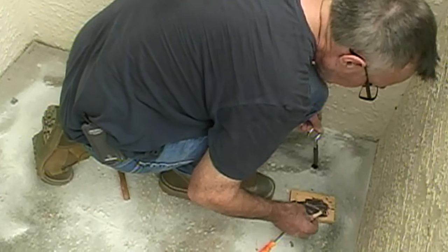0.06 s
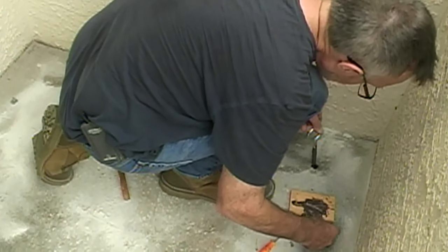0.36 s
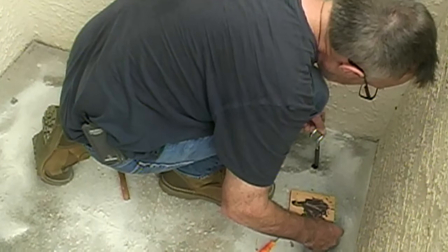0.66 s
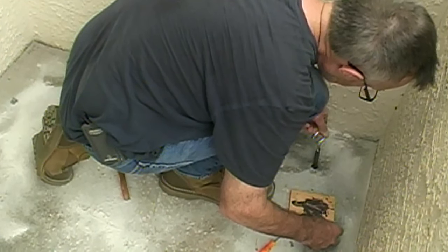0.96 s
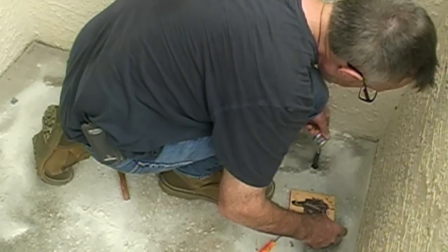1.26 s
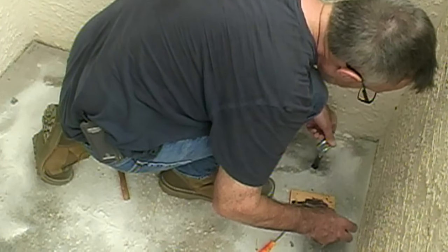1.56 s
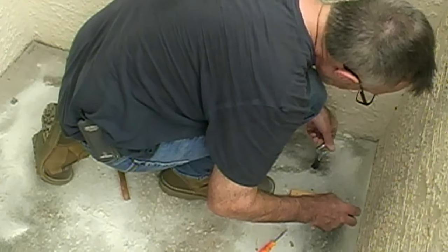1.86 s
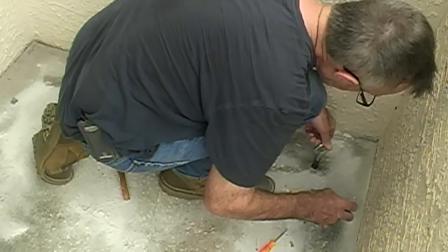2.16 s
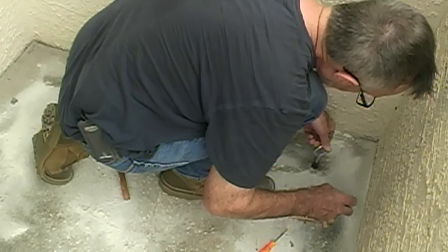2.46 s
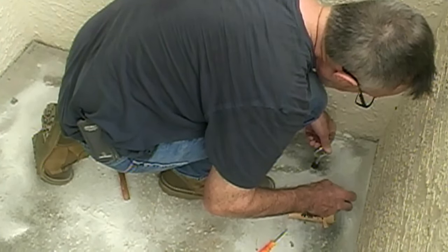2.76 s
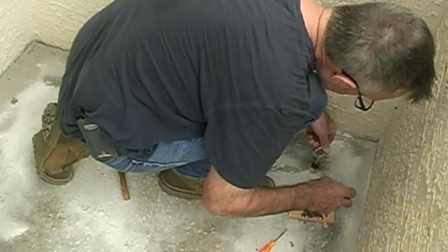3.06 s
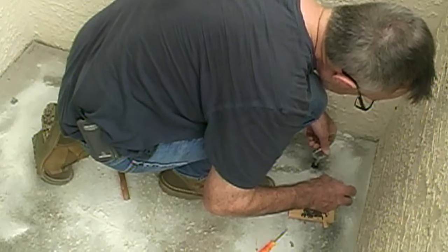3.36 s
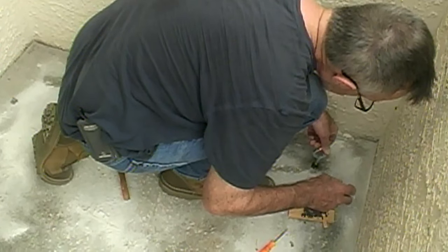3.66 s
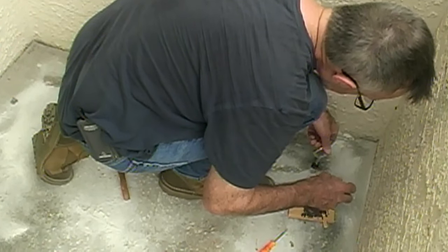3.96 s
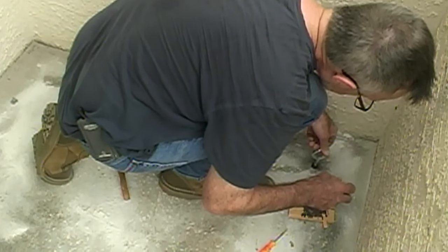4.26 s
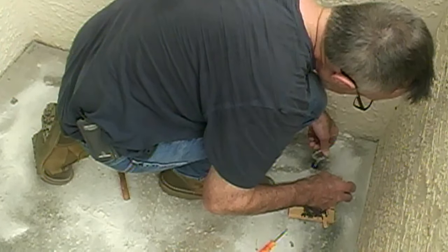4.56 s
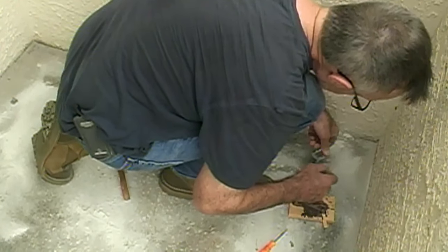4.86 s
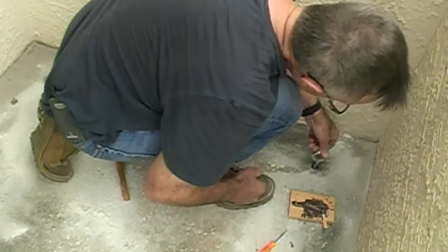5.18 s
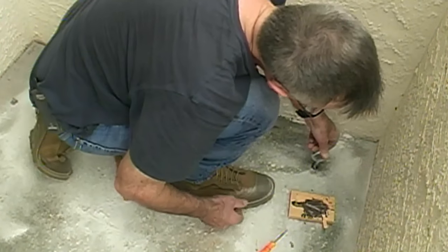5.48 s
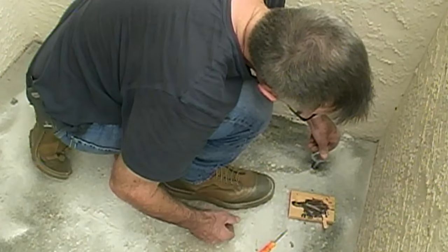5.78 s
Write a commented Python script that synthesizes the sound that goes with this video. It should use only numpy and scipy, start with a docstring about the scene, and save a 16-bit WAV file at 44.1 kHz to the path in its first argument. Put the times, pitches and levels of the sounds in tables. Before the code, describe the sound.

Five sharp, dry hand tool clicks, light ticks, cloth rustle and a boot knock over a low outdoor hum and a faint bird.

```python
"""Five dry tool clicks, light ticks, scuffs and a boot knock over a low outdoor hum and a faint bird.
Someone kneels in a concrete corner and works epoxy around a steel bolt with hand tools.
Each click is a tool snapping against its seat: it rings, chatters, thuds into a board and echoes.
Cloth rustles and grit cracks as the weight shifts. A machine hums some way off, a thin whine carries
from afar, and a soft hiss rises and falls like faint breathing over an outdoor rumble."""
import sys
import numpy as np
from scipy import signal
from scipy.fft import rfft, irfft
from scipy.io import wavfile
from scipy.ndimage import uniform_filter1d

SR = 44100
rng = np.random.default_rng(int(sys.argv[2]) if len(sys.argv) > 2 else 0)


def output_pcm(signal):
    """Save a mono or channel-first signal as 16-bit PCM at the path in sys.argv[1].

    Samples are clipped to [-1, 1] before scaling.
    """
    pcm = np.clip(np.atleast_2d(signal).T, -1, 1) * 32767
    wavfile.write(sys.argv[1], SR, np.round(pcm).astype(np.int16))


N = 256662
T = np.arange(N) / SR
HIT_T = T[:SR // 7]

# Spectra of rumble and hiss. Each row: frequency in Hz, relative density in dB.
RUMBLE_SPECTRUM = [(15, -42), (28, -3), (42, -9), (55, 1), (72, 3), (100, -1), (125, -6.5), (165, -10.5),
                   (190, -16), (260, -22.5), (400, -46)]
HISS_SPECTRUM = [(150, -14), (250, -1.5), (267, -10), (336, -5), (384, -6.5), (423, -7.5), (542, -8.5),
                 (661, -6.5), (1010, -8.5), (1260, -8), (2230, -15.5), (5620, -21.5), (12800, -31),
                 (16600, -66), (22000, -120)]
# Breath-like rise and fall of the hiss, and slow swell of the rumble.
# Each row: time in seconds, hiss gain in dB, rumble gain in dB.
HISS_RUMBLE_DB = [(0.0, -50.5, -38), (0.55, -55.5, -39), (0.94, -54, -41), (1.89, -56.5, -38.5),
                  (2.46, -51, -39.5), (2.77, -54.5, -38), (3.35, -54, -40.5), (4.05, -56, -38.5),
                  (4.28, -54.5, -41.5), (5.19, -50, -40), (5.62, -52.5, -41.5), (5.82, -53.5, -38)]
# How well the whine carries. Each row: time in seconds, gain in dB.
WHINE_CARRY_DB = [(0, -6.5), (1.8, -1.5), (2.3, 4.5), (3.8, 8), (4.3, 3.5), (5.82, 7)]
# Machine hum. Each row: frequency in Hz, level in dB re the rumble's swell, waver as a share of the line.
HUM_LINES = [(69.73, -2.5, 0.51), (142.9, -11.5, 0.49), (160.1, -11, 0.41)]
# Falling bird phrases. Each row: start in seconds, rough length in seconds, first pitch in Hz,
# step down in semitones, level in dB.
BIRD_PHRASES = [(.24, .15, 2547, 2.5, -54), (0.522, .15, 2648, 1.5, -54), (1.279, .15, 2100, 2.5, -58),
                (3.218, .22, 2665, 2.3, -51.5), (3.821, .15, 2340, 1.8, -53.5), (4.323, .07, 2626, 0, -55)]
# Rising flicks and level peeps. Each row: start in seconds, starting pitch in Hz, level in dB.
BIRD_FLICKS = [(1.087, 2370, -52), (3.785, 2420, -51), (5.735, 2596, -48.5)]
BIRD_PEEPS = [(2.915, 2398, -55.5), (3.729, 2440, -53.5), (5.39, 2876, -51.5), (5.5, 3600, -56.5)]
# Scuffs of sleeve, jeans and sole. Each row: midpoint in seconds, level in dB, band centre in Hz.
CLOTH_SCUFFS = [(2.163, -53.5, 6450), (3.683, -49.5, 8500), (4.579, -46.5, 6540), (4.612, -48, 2900),
                (5.126, -49.5, 10000), (5.273, -45, 5970), (5.407, -51, 6000), (5.438, -46.5, 6950),
                (5.519, -49.5, 5400), (5.613, -50, 2500)]
# Boot set down. Each row: start in seconds, level in dB.
BOOT_KNOCKS = [(5.3277, -25)]
# Modes of boot knock, board and tool. Each row: frequency in Hz, relative level in dB, T60 in seconds.
BOOT_MODES = [(418, 2, 0.14), (590, 0, .04), (713, -6.5, 0.09), (810, 2.5, 0.047), (1190, 1.5, 0.03),
              (1840, 5.5, 0.012), (2470, 3, 0.0092)]
BOARD_MODES = [(152.5, 0, 0.13), (242, 6.5, 0.011), (344, -2.5, 0.033), (464, -10, 0.021),
               (543, -3.5, 0.007)]
TOOL_MODES = [(425, -12, .06), (570, -8, .03), (1005, -9, .045), (1160, -8, .025), (1380, -8, .025),
              (1640, -4, .02), (1790, -5, .022), (1980, -8, .025), (2220, -7, .025), (2680, -14, .045),
              (2820, -10, .02), (3070, -4, .02), (3230, -11, .02), (3670, -11, .025), (3820, -8, .025),
              (4130, -5, .018), (4420, -12, .015), (4780, -14, .015), (5300, -7, .012), (5560, -6, .014),
              (5760, -3, .015), (6400, -9, .016), (6950, -3, .016), (7380, -10, .02), (7920, -10, .014),
              (8780, -6, .009), (9680, -8, .012), (10000, -7, .01), (10250, -13, .015), (10680, -11, .01)]
# Contact noise and its echo. Each row: frequency in Hz, relative density in dB.
CONTACT_SPECTRUM = [(100, -2), (300, -0.5), (520, 8), (800, 16), (1050, 11), (1800, 0), (2450, 9),
                    (3500, -7), (4700, 3), (6500, -3), (10000, -7.5), (13000, -17)]
# Antiresonances of every click and tick. Each row: frequency in Hz, gain in dB.
CLICK_NOTCHES = [(820, -14), (2480, -8.5), (4720, -5.5), (6350, -1), (7950, -4.5)]
# Light ticks of the tool tip. Each row: start in seconds, level in dB, treble shelf in dB,
# favoured ring in Hz, its gain in dB.
TIP_TICKS = [(0.2986, -41.5, -18, 3280, 12), (2.407, -45, -17, 1700, 15), (2.8453, -30.5, -3, 2200, 8),
             (2.8484, -30, -20, 3750, 6), (2.863, -42, -3, 3600, -4), (3.2573, -53.5, 10, 8000, 7),
             (4.095, -49, -1, 5700, 8), (5.2135, -36.5, -28, 3250, 3), (5.7756, -33.5, -9, 1720, 7)]
# Tool clicks. Each row: start in seconds, level in dB, bass shelf in dB, treble shelf in dB,
# favoured ring in Hz, chatter time in seconds, board thud level in dB.
TOOL_CLICKS = [(2.3048, -24.5, 7, 3.5, 5600, 0.0049, -26.5), (2.85, -20.5, -3.5, -2, 2000, 0.002, -44),
               (3.5324, -20, -2.5, 13, 6650, 0.0013, -31.5), (4.6298, -16, -1, 2.5, 1560, 0.0028, -36),
               (4.7648, -15, -5.5, 1, 2800, 0.0015, -26.5)]


def undb(db):
    """Decibels to gain."""
    return 10 ** (np.asarray(db) / 20)


def unit_rms(x):
    """Scale to rms 1."""
    return x / np.sqrt(np.mean(x ** 2))


def unit_hit(x):
    """Scale to the energy of 5 ms at rms 1."""
    return x / np.sqrt(np.sum(x ** 2) / (.005 * SR))


def curve(rows, column=1):
    """One column of a timed table, joined by straight lines."""
    columns = np.transpose(rows)
    return np.interp(T, columns[0], columns[column])


def add(out, start_s, x):
    """Mix x into out."""
    i = max(int(start_s * SR), 0)
    out[i:i + len(x)] += x[:max(N - i, 0)]


def noise(spectrum, size):
    """Coloured noise at rms 1."""
    hz, db = np.transpose(spectrum)
    bins_hz = np.maximum(np.fft.rfftfreq(size, 1 / SR), 1)
    gain = undb(np.interp(np.log(bins_hz), np.log(hz), db))
    return unit_rms(irfft(rfft(rng.standard_normal(size)) * gain, size))


def filtered(x, hz, kind, order=2):
    """Butterworth filter."""
    return signal.sosfilt(signal.butter(order, hz, kind, fs=SR, output="sos"), x)


def bell_eq(x, hz, db, q=2.5):
    """Boost or cut one band."""
    return x + (undb(db) - 1) * signal.lfilter(*signal.iirpeak(hz, q, fs=SR), x)


def wander(rate_hz):
    """Smooth random signal, spread near 1."""
    hold = int(SR / rate_hz)
    steps = np.repeat(rng.standard_normal(N // hold + 1), hold)
    return 1.3 * uniform_filter1d(uniform_filter1d(steps, hold), hold)[:N]


def ring(modes, scatter_db=0):
    """Modes decaying after one push; their strengths scatter with the point of contact."""
    return sum(undb(db + scatter_db * rng.standard_normal() - 60 * HIT_T / t60_s)
               * np.cos(2 * np.pi * hz * HIT_T) for hz, db, t60_s in modes)


def rumble_and_hiss(rumble_db=-.5, hiss_db=2.5):
    """Soft hiss that rises and falls like faint breathing, over a slowly swelling outdoor rumble."""
    rumble = noise(RUMBLE_SPECTRUM, N) * undb(rumble_db + curve(HISS_RUMBLE_DB, column=2))
    hiss = noise(HISS_SPECTRUM, N) * undb(hiss_db + curve(HISS_RUMBLE_DB))
    return rumble + hiss


def distant_whine(base_hz=215.9, gain_db=-65, tilt_db_per_oct=-4.5, drift=.0012, flutter_db=3.5):
    """Harmonics 2 to 22 of one speed, fluttering in three groups on their way."""
    turns = np.cumsum(base_hz * (1 + drift * wander(5))) / SR
    flutter = [unit_rms(undb(flutter_db * wander(7))) for _ in range(3)]
    lines = np.zeros(N)
    for k in range(2, 23):
        gain = undb(tilt_db_per_oct * np.log2(k)) * flutter[k % 3]
        lines += gain * np.sin(2 * np.pi * k * (turns + rng.random()))
    return np.sqrt(2) * lines * undb(gain_db + curve(WHINE_CARRY_DB))


def machine_hum():
    """Low lines that waver in level and phase and swell with the rumble."""
    out = np.zeros(N)
    for hz, db, waver in HUM_LINES:
        sway = 1 + waver * (wander(9) + 1j * wander(9))
        carrier = np.exp(2j * np.pi * (hz * T + rng.random()))
        out += undb(db) * unit_rms(np.real(sway * carrier))
    return out * undb(curve(HISS_RUMBLE_DB, column=2))


def whistle(contour_hz, warble=.03, warble_hz=220):
    """One note along a pitch contour; fast warble makes it slightly raspy."""
    size = len(contour_hz)
    hz = contour_hz * (1 + warble * wander(warble_hz)[:size])
    return np.sin(2 * np.pi * np.cumsum(hz) / SR) * signal.windows.tukey(size, .5)


def bird(t60_s=.38, wet_db=1):
    """Falling phrases, rising flicks and level peeps, blurred by walls and trees."""
    note_s, overlap_s, sag_oct_per_s, fade_db_per_note = .072, .012, 1.21, .8
    flick_s, flick_oct_per_s, peep_s = .049, 7, .062
    sag = 2 ** (-sag_oct_per_s * T[:int((note_s + overlap_s) * SR)])
    rise = 2 ** (flick_oct_per_s * T[:int(flick_s * SR)])
    out = np.zeros(N)
    for start_s, length_s, first_hz, step_semitones, db in BIRD_PHRASES:
        for k in range(round(length_s / note_s)):
            note_hz = first_hz * 2 ** (-k * step_semitones / 12)
            add(out, start_s + k * note_s, undb(db - k * fade_db_per_note) * whistle(note_hz * sag))
    for start_s, hz, db in BIRD_FLICKS:
        add(out, start_s, undb(db) * whistle(hz * rise))
    for start_s, hz, db in BIRD_PEEPS:
        add(out, start_s, undb(db) * whistle(np.full(int(peep_s * SR), hz)))
    tail = rng.standard_normal(SR) * undb(-60 * T[:SR] / t60_s)
    return out + undb(wet_db) * signal.fftconvolve(out, tail / np.linalg.norm(tail))[:N]


def movement_db(peak_s=5.29, peak_db=-55.5, rise_db_per_s=13, fall_db_per_s=23, floor_db=-68):
    """Rustle level: one shift of weight above a floor of small arm movements."""
    drop_db = np.maximum(rise_db_per_s * (peak_s - T), fall_db_per_s * (T - peak_s))
    return np.maximum(peak_db - drop_db, floor_db)


def boot_grit(grains_per_s=14, over_rustle_db=2.5, t60_s=.015):
    """Grains crack under the boot at random, louder with stronger movement."""
    cracks = (rng.random(N) < grains_per_s / SR) * undb(movement_db() + over_rustle_db)
    burst = rng.standard_normal(len(HIT_T)) * undb(-60 * HIT_T / t60_s)
    grain = unit_hit(filtered(burst, 2500, "high"))
    return signal.fftconvolve(cracks, grain)[:N]


def slips(size, spread_db=1, density=.12):
    """Friction: dense tiny slips of unequal size."""
    impulses = rng.standard_normal(size) * (rng.random(size) < density)
    return impulses * undb(spread_db * np.minimum(rng.exponential(size=size), 5))


def clothes(scuff_s=.046):
    """Rubbing cloth and sole: short scuffs over a crackling rustle."""
    rustle = unit_rms(filtered(slips(N, spread_db=3.5), [900, 9000], "band", order=1))
    out = rustle * undb(movement_db() + 1.8 * wander(45))
    size = int(scuff_s * SR)
    for mid_s, db, hz in CLOTH_SCUFFS:
        rub = filtered(slips(size), [hz * .5, hz * 1.37], "band")
        scuff = unit_rms(rub * undb(2.9 * wander(410)[:size]))
        add(out, mid_s - scuff_s / 2, undb(db) * scuff * np.hanning(size))
    return out


def thud(modes, cutoff_hz):
    """A dull blow: low-passed modes."""
    return unit_hit(filtered(ring(modes), cutoff_hz, "low"))


def boot_knock():
    """The boot is set down."""
    out = np.zeros(N)
    for start_s, db in BOOT_KNOCKS:
        add(out, start_s, undb(db) * thud(BOOT_MODES, cutoff_hz=2500))
    return out


def diffuse(x, lags_s=(.00029, .00067), feedback=.55):
    """The blow runs back and forth along the tool: all-passes spread its edge."""
    for lag_s in lags_s:
        taps = np.r_[feedback, np.zeros(int(lag_s * SR)), 1]
        x = signal.lfilter(taps, taps[::-1], x)
    return x


def corner_echo(corner_t60_s=.12, yard_t60_s=.17, yard_db=-27, rise_s=.0014):
    """Noise tail of the corner, with a fainter, longer one from the yard."""
    fade = undb(-60 * HIT_T / corner_t60_s) + undb(yard_db - 60 * HIT_T / yard_t60_s)
    onset = 1 - np.exp(-HIT_T / rise_s)
    return unit_hit(noise(CONTACT_SPECTRUM, len(HIT_T)) * fade * onset)


def wall_reflection(x, lag_s=.016, gain_db=-22):
    """One smeared, duller return off the wall."""
    dulled = filtered(diffuse(x), 5500, "low")
    return undb(gain_db) * np.interp(HIT_T - lag_s, HIT_T, dulled, left=0)


def contact_colour(x, bass_db, treble_db, ring_hz, ring_db):
    """A heavy contact has more bass, a hard one more treble; its position favours one band."""
    x = x + (undb(bass_db) - 1) * filtered(x, 600, "low", order=1)
    x = x + (undb(treble_db) - 1) * filtered(x, 4500, "high", order=1)
    return bell_eq(x, ring_hz, ring_db)


def click(bass_db, treble_db, ring_hz, ring_db, chatter_s, echo_db, rattle_db=-6, crack_db=-9):
    """The tool snaps against its seat, rings, chatters and echoes in the corner."""
    modes = unit_hit(filtered(diffuse(ring(TOOL_MODES, scatter_db=1)), 9700, "low"))
    contact = np.exp(-(HIT_T / chatter_s) ** 2)
    # Tiny rebounds strike the same modes again.
    rebounds = rng.standard_normal(len(HIT_T)) * contact * HIT_T / chatter_s
    rattle = unit_hit(signal.fftconvolve(modes, rebounds)[:len(HIT_T)])
    crack = unit_hit(noise(CONTACT_SPECTRUM, len(HIT_T)) * contact)
    sound = modes + undb(rattle_db) * rattle + undb(crack_db) * crack + undb(echo_db) * corner_echo()
    sound = contact_colour(sound, bass_db, treble_db, ring_hz, ring_db)
    for hz, db in CLICK_NOTCHES:
        sound = bell_eq(sound, hz, db, q=8.5)
    return unit_hit(sound + wall_reflection(sound))


def hand_tools(tick_bass_db=-8):
    """Loud clicks that thud into the board under the tool, and light ticks of the tip."""
    out = np.zeros(N)
    for start_s, db, bass_db, treble_db, ring_hz, chatter_s, thud_db in TOOL_CLICKS:
        snap = click(bass_db, treble_db, ring_hz, ring_db=3, chatter_s=chatter_s, echo_db=-11.5)
        add(out, start_s, undb(db) * snap + undb(thud_db) * thud(BOARD_MODES, cutoff_hz=570))
    for start_s, db, treble_db, ring_hz, ring_db in TIP_TICKS:
        tick = click(tick_bass_db, treble_db, ring_hz, ring_db, chatter_s=.0027, echo_db=-9)
        add(out, start_s, undb(db) * tick)
    return out


def scene():
    """The worker and the surroundings, in mono."""
    worker = hand_tools() + boot_knock() + clothes() + boot_grit()
    return (worker + bird() + machine_hum() + distant_whine() + rumble_and_hiss())[None]


def record(dry):
    """Steep low-pass at 12850 Hz."""
    return signal.sosfilt(signal.ellip(10, .2, 80, 12850, fs=SR, output="sos"), dry)


dry = scene()
out = record(dry)
output_pcm(out)
```